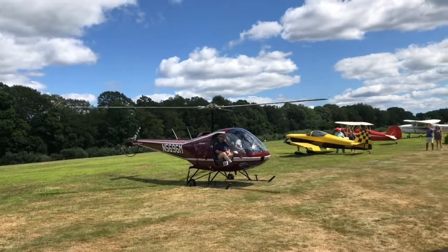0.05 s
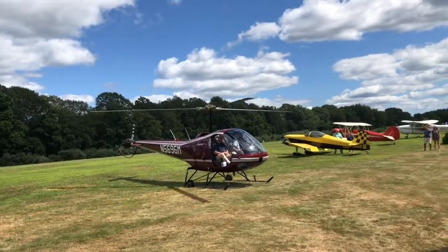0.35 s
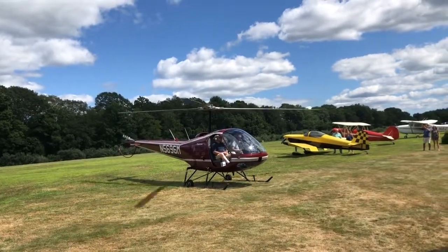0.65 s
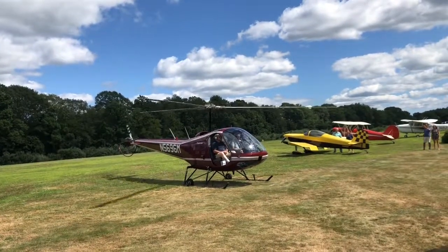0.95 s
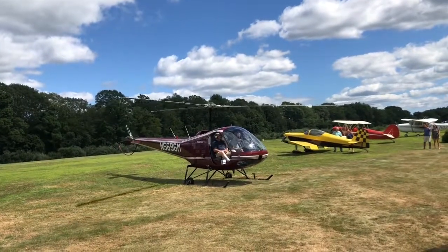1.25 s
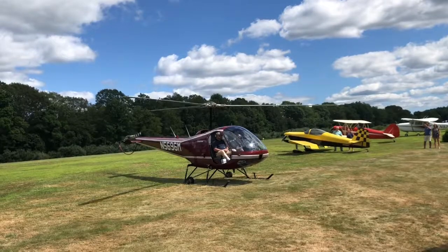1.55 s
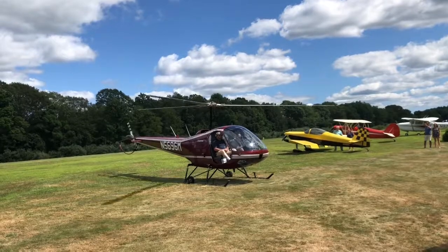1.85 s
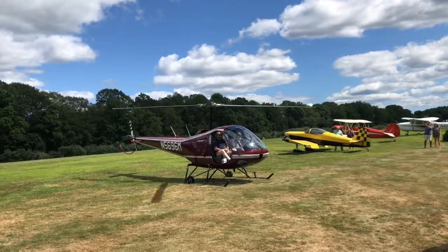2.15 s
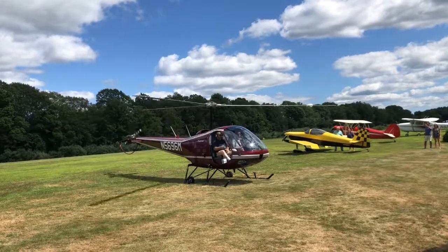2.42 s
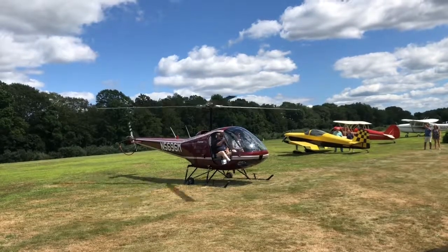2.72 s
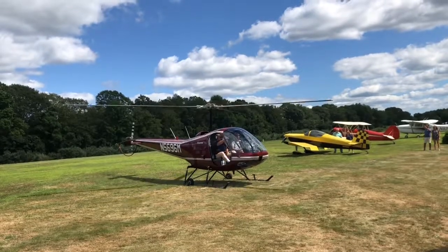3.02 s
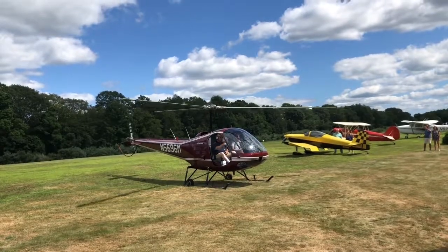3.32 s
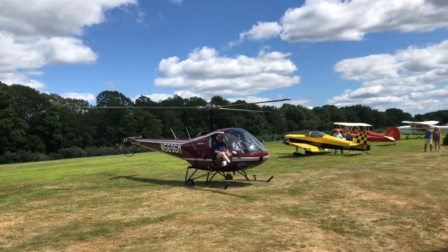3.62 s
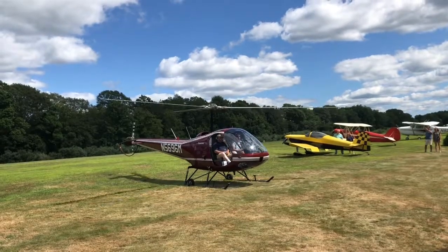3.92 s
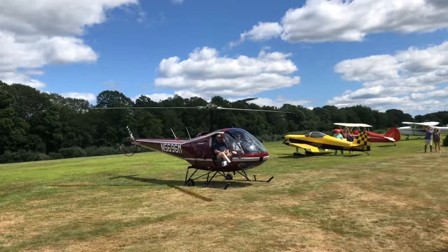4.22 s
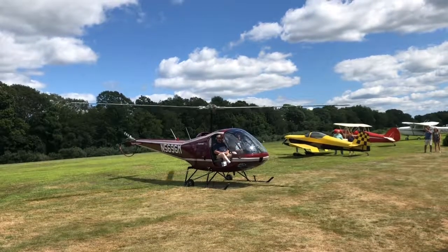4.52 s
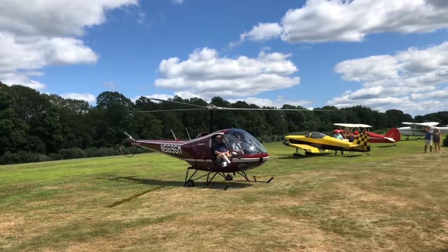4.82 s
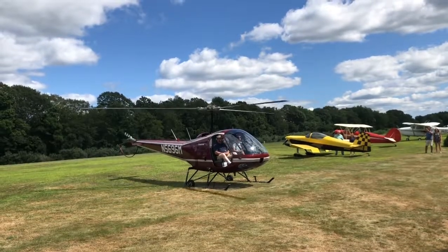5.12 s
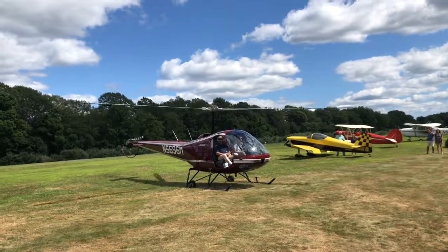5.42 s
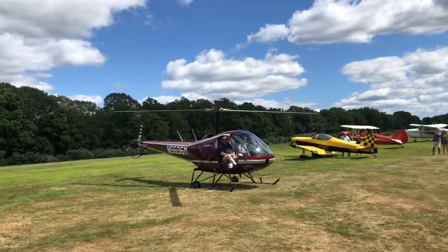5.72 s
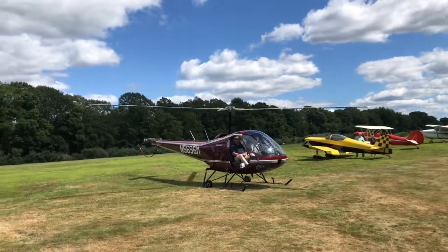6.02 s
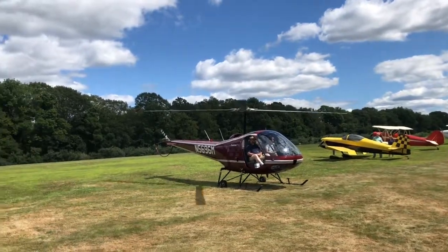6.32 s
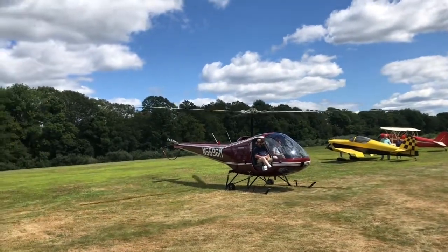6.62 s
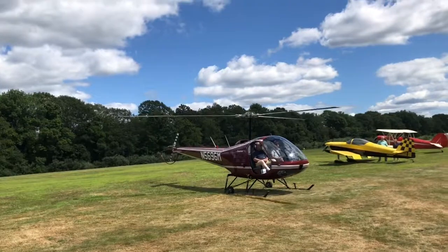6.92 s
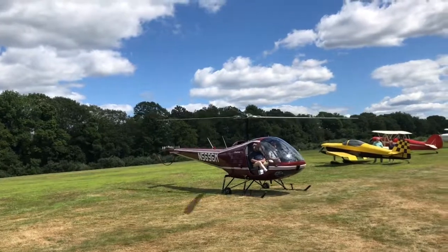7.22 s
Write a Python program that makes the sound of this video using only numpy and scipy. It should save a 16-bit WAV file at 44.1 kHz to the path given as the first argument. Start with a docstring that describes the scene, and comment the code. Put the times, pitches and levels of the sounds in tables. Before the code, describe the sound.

Heard from a fixed position on an open airfield, a small helicopter's engine throbs and clatters as its rotor gradually gains speed. The blades make a fast, regular swishing with thin downward whistles. Midway the throttle closes and the engine sputters low for about a second, then climbs back into a beating drone, with a short surge of tail rotor buzz toward the end.

```python
"""A light piston helicopter runs up on a grass airfield.
The flat-four engine lopes through two exhaust pipes, then smooths out as it gathers speed.
Three main blades swish past, two of them whistling clearly in falling Doppler sweeps.
At 3.8 s the throttle is closed for about a second: the revs drop, the firing turns ragged and dull.
It opens again, the speed climbs, and near 6.6 s the buzz of the tail rotor swells."""
import sys
import numpy as np
from scipy import signal
from scipy.fft import rfft, irfft
from scipy.io import wavfile
from scipy.ndimage import uniform_filter1d

SR = 44100
rng = np.random.default_rng(int(sys.argv[2]) if len(sys.argv) > 2 else 0)


def inscribe(sig):
    """Save sig as 16-bit PCM at rate SR to the path in sys.argv[1].

    A 1-D sig is mono; a 2-D sig holds one channel per row.
    Samples are clipped to [-1, 1] before scaling.
    """
    pcm = np.round(np.clip(np.atleast_2d(sig).T, -1, 1) * 32767)
    wavfile.write(sys.argv[1], SR, pcm.astype(np.int16))


N = 324135
TIME = np.arange(N) / SR

# cylinders in firing order: pipe (0 long, 1 short), level/dB
FIRING_ORDER = [(0, 6), (0, 4), (1, 3.5), (1, 5.5)]
# main blades: hub position/turns, whistle/dB, swish/dB
MAIN_BLADES = [(0, -28, 0), (1 / 3, -44, 0), (2 / 3, -30.5, 0.14)]


def from_db(db):
    """Decibels to gain."""
    return 10 ** (np.asarray(db) / 20)


def unit_rms(x):
    """Scale to rms 1."""
    return x / np.sqrt(np.mean(x ** 2) + 1e-20)


def evened(x):
    """Rms 1 over every third of a second; quicker throbs stay."""
    return x / np.sqrt(np.abs(uniform_filter1d(x ** 2, size=SR // 3)) + 1e-14)


def curve(rows):
    """Breakpoints (t/s, value) at every sample."""
    return np.interp(TIME, *np.transpose(rows))


def spell(start_s, rise_s, hold_s, fall_s):
    """Trapezoid envelope, 0-1."""
    end_s = start_s + rise_s + hold_s + fall_s
    return np.clip(np.minimum((TIME - start_s) / rise_s, (end_s - TIME) / fall_s), 0, 1)


def cut(x, hz, kind, order=2):
    """Butterworth filter."""
    return signal.sosfilt(signal.butter(order, hz, kind, fs=SR, output="sos"), x)


def split(x, hz, kind):
    """Zero-phase filter; subtracting its output leaves the other band."""
    return signal.sosfiltfilt(signal.butter(4, hz, kind, fs=SR, output="sos"), x)


def drift(hz):
    """Random wander up to the given rate, rms 1."""
    return unit_rms(cut(rng.standard_normal(N + SR), hz, "low")[SR:])


def noise(spectrum):
    """Noise shaped by rows of f/Hz, level/dB; rms 1."""
    hz, db = np.transpose(spectrum)
    bins_hz = np.maximum(np.arange(N // 2 + 1) * SR / N, 1)
    gain = from_db(np.interp(np.log(bins_hz), np.log(hz), db, left=-60))
    return unit_rms(irfft(rfft(rng.standard_normal(N)) * gain, N))


def noisy_tone(hz, width_hz):
    """Noise band around a steady or moving centre, rms 1."""
    phase = 2 * np.pi * np.cumsum(np.broadcast_to(hz, N)) / SR
    a, b = (unit_rms(cut(drift(width_hz), width_hz / 2, "low")) for _ in range(2))
    return a * np.cos(phase) + b * np.sin(phase)


def beats(phase):
    """Samples at which a phase passes a whole number."""
    return np.flatnonzero(np.diff(np.floor(phase)) > 0)


def clicks(at, heights):
    """Train of single-sample pulses."""
    return np.bincount(np.clip(at, 0, N - 1).astype(int), heights, N) + 1e-18


def doppler(turn, mach):
    """Pitch ratio of a circling source, highest at whole turns; the approach is squeezed in time."""
    angle = np.linspace(0, 2 * np.pi, 512)
    heard_turn = (angle - mach * np.sin(angle)) / (2 * np.pi)
    return np.interp(turn % 1, heard_turn, 1 / (1 - mach * np.cos(angle)))


def load_db(law, octaves, closed):
    """Level that grows with speed and drops with the throttle shut."""
    nominal_db, db_per_octave, shut_loss_db = law
    return nominal_db + db_per_octave * octaves - shut_loss_db * closed


def whine(fade_s=.25, flicker_db=3.0, flicker_hz=14):
    """A thin, flickering whine comes and goes, each time at a slightly different pitch."""
    # whine spells: start/s, end/s, f/Hz, width/Hz, level/dB
    spells = [(1.8, 3.15, 13850, 500, -43), (3.1, 3.9, 13300, 900, -37.5), (5.1, 6.35, 14000, 200, -44),
              (6.95, 7.604, 13450, 400, -42)]
    tones = sum(from_db(db) * spell(start, fade_s, end - start - 2 * fade_s, fade_s)
                * noisy_tone(hz, width_hz) for start, end, hz, width_hz, db in spells)
    return tones * from_db(flicker_db * drift(flicker_hz))


def rasp(hz=2000, width_hz=1700, level_db=-37):
    """A dry rasp swells and fades as the engine first gathers speed."""
    envelope = spell(start_s=1.9, rise_s=.76, hold_s=.96, fall_s=.35)
    return from_db(level_db) * envelope * noisy_tone(hz, width_hz)


def gears(rotor_hz, fade_s=.5):
    """Two faint gear tones come and go, climbing with the rotor."""
    # gear tone spells: start/s, end/s, multiple of rotor speed, width/Hz, level/dB
    spells = [(0.55, 3.2, 186, 7.4, -44.5), (5.2, 7.9, 186, 12.4, -43), (4.9, 7.2, 221, 42, -40.5)]
    return sum(from_db(db) * spell(start, fade_s, end - start - 2 * fade_s, fade_s)
               * noisy_tone(multiple * rotor_hz, width_hz) for start, end, multiple, width_hz, db in spells)


def tail_rotor(turn, level_db, slaps_per_turn=14.36, scatter_db=5.0, swell_db=5.8):
    """Small geared blades slap the air as they pass the tail boom, harder for a moment."""
    at = beats(slaps_per_turn * turn)
    slaps = clicks(at, from_db(scatter_db * rng.uniform(-1.1, 1, len(at))))
    buzz = cut(cut(slaps, 670, "high"), 1060, "low")
    swell = np.exp(-((TIME - 6.6) / .19) ** 2)
    return from_db(level_db + swell_db * swell) * unit_rms(buzz)


def hiss(turn, rotor_hz, level_db, top_db_per_hz=1.5, swell_depth=.28, lag_turns=.19):
    """Turbulent air swells with each passing blade and brightens with rotor speed."""
    # air spectrum: f/Hz, relative level/dB
    spectrum = [(1500, -7), (3000, -3), (4200, -2.5), (5300, 5.5), (6400, 10.5), (7500, 5), (9000, 1),
                (11500, -1), (13500, 0), (16000, -17)]
    air = noise(spectrum)
    low, top = split(air, 5000, "low"), split(air, 8500, "high")
    swell = 1 + swell_depth * np.cos(2 * np.pi * len(MAIN_BLADES) * (turn - lag_turns))
    top_gain = from_db(top_db_per_hz * (rotor_hz - rotor_hz.mean()))
    return from_db(level_db) * (low + swell * (air - low - top) + top_gain * top)


def whistles(turn, octaves, tip_hz=12880, mach=.385, lead_turns=.184, flutter_db=3.0, db_per_octave=1.0):
    """Air sings across the blade tips as they face the listener; speed roughens the tone."""
    waver = .014 * 2 ** (3.53 * octaves)
    out = 0
    for place, whistle_db, _ in MAIN_BLADES:
        swing = (turn - place + lead_turns) % 1
        ratio = doppler(swing, mach)
        hz = tip_hz * ratio * (1 + waver * drift(606))
        tone = np.sqrt(2) * np.sin(2 * np.pi * np.cumsum(hz) / SR)
        facing = np.interp(swing, [0, .05, .4, .48, .7], [0, 1, 1, .4, 0])
        beam = np.minimum(ratio, 1.03) ** 3
        out += from_db(whistle_db + flutter_db * drift(28)) * facing * beam * tone
    return out * from_db(db_per_octave * octaves)


def swishes(turn, rotor_hz, level_db, mach=.28, cycles_per_turn=1880, width_hz=950,
            pitch_lead_turns=.145, beam_lead_turns=.12, beaming=5.5, flutter_db=3.5):
    """Vortices shed along each blade hiss at a pitch set by its speed, beamed forward on approach."""
    # blade sections: radius/tip radius, level/dB
    sections = [(.84, 2.5), (.92, 3.5), (1, -0.5)]
    out = 0
    for place, _, swish_db in MAIN_BLADES:
        for radius, db in sections:
            ratio = doppler(turn - place + pitch_lead_turns, mach * radius)
            beam = doppler(turn - place + beam_lead_turns, mach * radius) ** beaming
            gain = from_db(swish_db + db + flutter_db * drift(41))
            out += gain * beam * noisy_tone(cycles_per_turn * radius * rotor_hz * ratio, width_hz)
    return from_db(level_db) * evened(out)


def clatter(cycle, level_db, throb=.07, flutter_db=1.0):
    """Valve gear and cooling air, swelling with every firing."""
    # clatter spectrum: f/Hz, relative level/dB
    spectrum = [(150, -8), (300, 3), (450, -2), (600, 1.5), (820, 1.5), (1000, -1), (1350, 0), (1700, -4),
                (2500, -8), (4000, -9.5), (8000, -14)]
    swell = 1 + throb * np.cos(2 * np.pi * len(FIRING_ORDER) * cycle)
    return from_db(level_db + flutter_db * drift(47)) * unit_rms(swell * noise(spectrum))


def firing(cycle, closed, long_pipe_lag_s=.0056):
    """Each bank puffs twice in a row into its own pipe, raggedly with the throttle shut."""
    ragged = .13 + .59 * closed
    jitter_s, scatter_db = .00004 + .0015 * ragged, .4 + 3.5 * ragged
    puffs = np.zeros((2, N))
    for k, (bank, db) in enumerate(FIRING_ORDER):
        at = beats(np.r_[-1, cycle[1:] - k / len(FIRING_ORDER)])
        size, late = rng.standard_normal((len(at), 2)).T
        delay_s = long_pipe_lag_s * (bank == 0) + late * jitter_s[at]
        puffs[int(bank)] += clicks(at + delay_s * SR, from_db(db + np.tanh(size) * scatter_db[at]))
    return puffs


def pipe(puffs, modes):
    """Parallel resonances of one exhaust pipe."""
    return sum(polarity * from_db(db) * signal.lfilter(*signal.iirpeak(hz, hz / width_hz, fs=SR), puffs)
               for hz, width_hz, db, polarity in modes)


def exhaust(cycle, closed, bark_db, crossover_hz=85, dull_hz=165):
    """Puffs ring two pipes: a deep boom, and above it a bark that dulls with the throttle shut."""
    # pipe resonances: f/Hz, width/Hz, level/dB, polarity
    long_modes = [(40.6, 93, -3.5, 1), (72.2, 10.8, 1.5, -1), (151.3, 24.3, 4.5, -1), (209.8, 17.8, 1, 1),
                  (358, 63, -0.5, 1)]
    short_modes = [(54.8, 21, 0.5, -1), (95.3, 27.6, -0.5, 1), (137.7, 48.4, -1, -1), (200, 22.8, 1.5, -1),
                   (327, 20, -15, 1)]
    # deep boom: t/s, level/dB
    boom_levels = [(0.05, -30), (0.15, -28), (1.08, -30), (1.74, -25), (2.96, -29.5), (3.89, -24),
                   (4.31, -32.5), (4.96, -27.5), (6.65, -24), (7.16, -30.5), (7.3, -26)]
    long_puffs, short_puffs = firing(cycle, closed)
    drone = pipe(long_puffs, long_modes) + pipe(short_puffs, short_modes)
    drone = cut(cut(drone, 49.4, "high", order=4), 214.3, "low", order=4)
    boom = split(drone, crossover_hz, "low")
    surge = np.cos(np.pi * (cycle - .54)) ** 24  # one cylinder barks above the rest
    lope_db = np.interp(TIME, [1, 2.3], [6, 0])
    bark = (drone - boom) * from_db(lope_db * surge)
    dullness = .14 + .62 * closed
    bark += dullness * (split(bark, dull_hz, "low") - bark)
    return from_db(curve(boom_levels)) * evened(boom) + from_db(bark_db) * evened(bark)


def scene(nominal_cycle_hz=15, nominal_rotor_hz=3.7, clatter_rotor_share=.6):
    """Engine and rotors from one spot on the grass; their speeds and the throttle drive the levels."""
    # engine speed: t/s, four-stroke cycle rate/Hz
    engine_speeds = [(0, 12.324), (0.95, 13.355), (1.8, 14.006), (2.9, 15.196), (3.785, 16.038),
                     (4.18, 10.824), (4.36, 10.385), (4.78, 12.901), (4.92, 15.435), (5.5, 15.588),
                     (6.45, 16.33), (7.35, 17.253)]
    # main rotor speed: t/s, turn rate/Hz
    rotor_speeds = [(0, 3.042), (1, 3.2), (2, 3.459), (3, 3.682), (3.85, 3.867), (4.9, 3.709), (5.6, 3.781),
                    (6.4, 3.937), (7.35, 4.152)]
    # level laws: level at nominal speed/dB, rise per speed doubling/dB, loss with throttle shut/dB
    bark_law = (-20.5, 4.1, 4)
    clatter_law = (-28.5, 12.6, 1.0)
    swish_law = (-28, 23.5, 0.1)
    hiss_law = (-30, 10.7, 0.62)
    tail_law = (-38.5, 25, 9.1)
    cycle_hz, rotor_hz = curve(engine_speeds), curve(rotor_speeds)
    cycle = np.cumsum(cycle_hz) / SR + .032
    turn = np.cumsum(rotor_hz) / SR - .392
    engine_octaves = np.log2(cycle_hz / nominal_cycle_hz)
    rotor_octaves = np.log2(rotor_hz / nominal_rotor_hz)
    clatter_octaves = engine_octaves + clatter_rotor_share * (rotor_octaves - engine_octaves)
    closed = spell(start_s=3.82, rise_s=.027, hold_s=.5, fall_s=.74)  # throttle: 0 open, 1 shut
    engine = (exhaust(cycle, closed, load_db(bark_law, engine_octaves, closed))
              + clatter(cycle, load_db(clatter_law, clatter_octaves, closed)))
    rotors = (swishes(turn, rotor_hz, load_db(swish_law, rotor_octaves, closed))
              + whistles(turn, rotor_octaves)
              + hiss(turn, rotor_hz, load_db(hiss_law, rotor_octaves, closed))
              + tail_rotor(turn, load_db(tail_law, rotor_octaves, closed)))
    return np.tile(engine + gears(rotor_hz) + whine() + rasp() + rotors, (2, 1))


def record(dry):
    """Steep low-pass at 15.9 kHz."""
    return signal.sosfilt(signal.ellip(12, .1, 90, 15900, fs=SR, output="sos"), dry)


dry = scene()
out = record(dry)
inscribe(out)
```